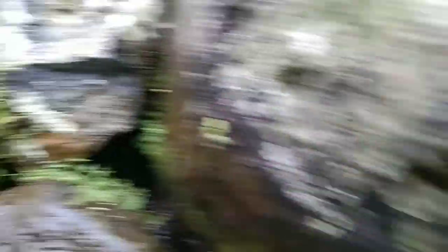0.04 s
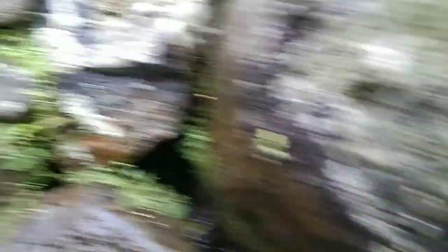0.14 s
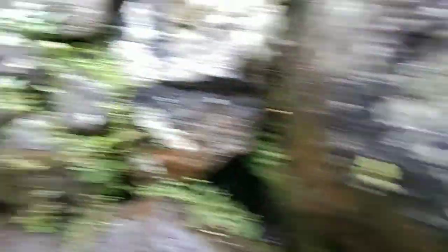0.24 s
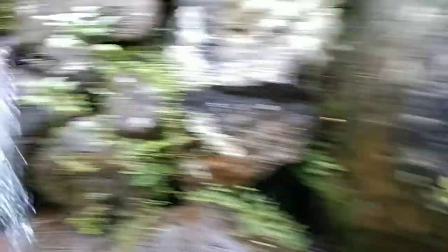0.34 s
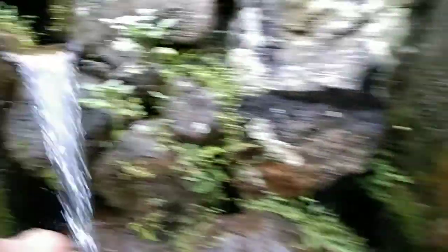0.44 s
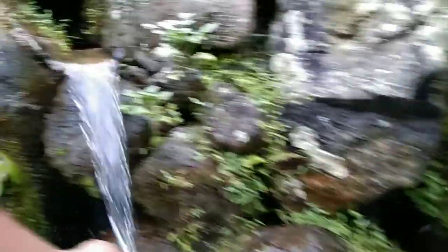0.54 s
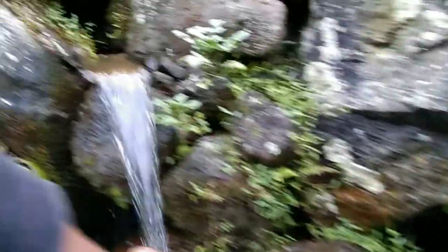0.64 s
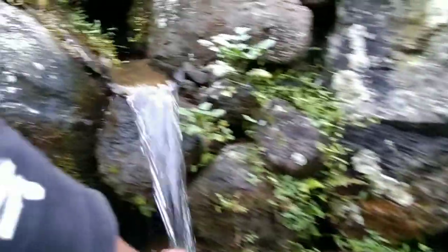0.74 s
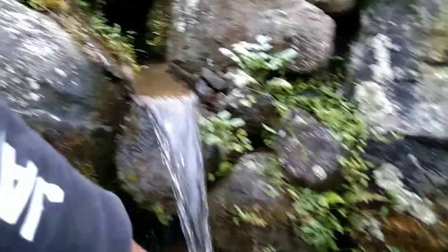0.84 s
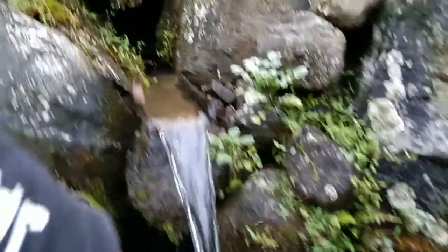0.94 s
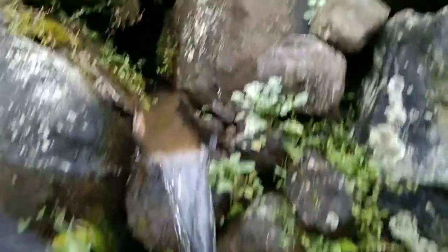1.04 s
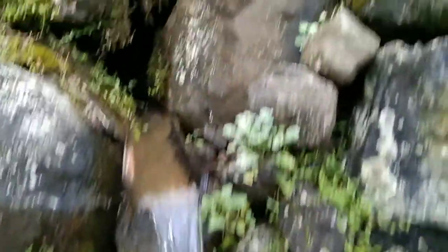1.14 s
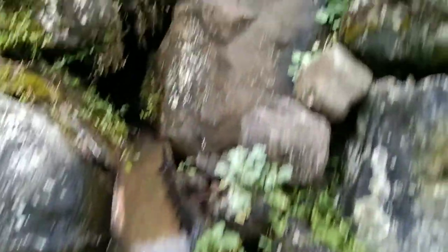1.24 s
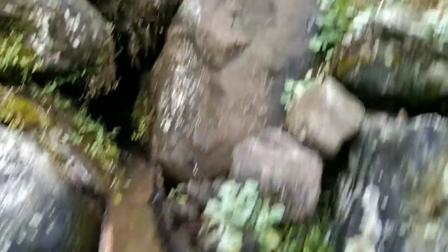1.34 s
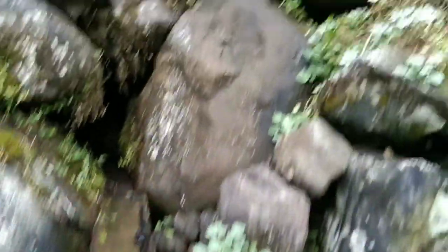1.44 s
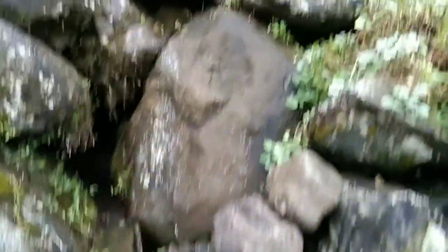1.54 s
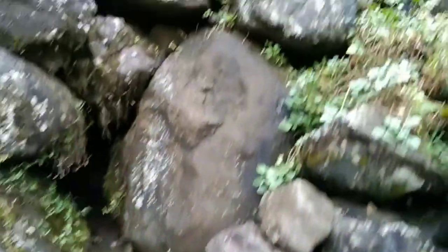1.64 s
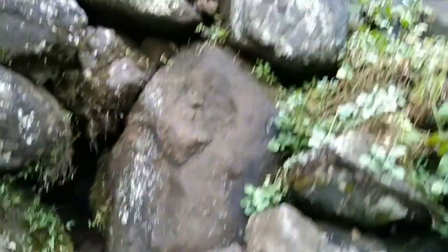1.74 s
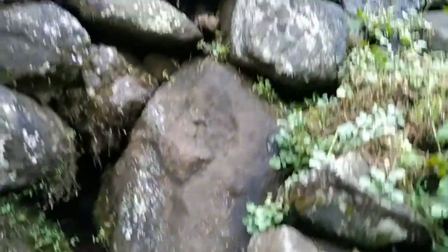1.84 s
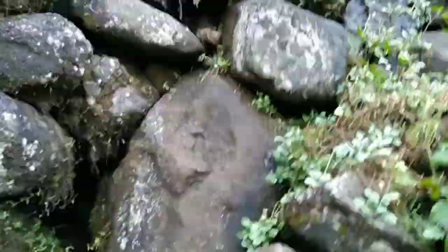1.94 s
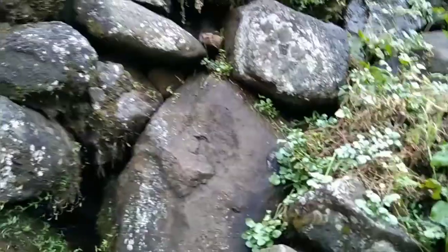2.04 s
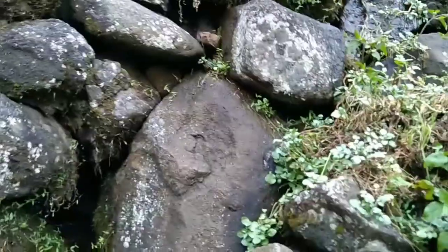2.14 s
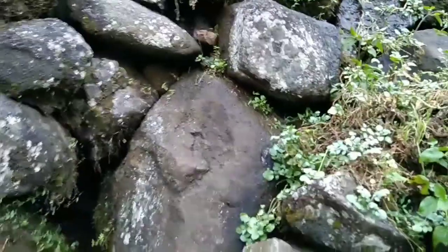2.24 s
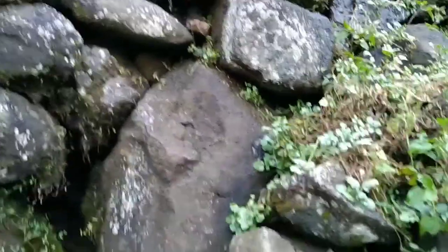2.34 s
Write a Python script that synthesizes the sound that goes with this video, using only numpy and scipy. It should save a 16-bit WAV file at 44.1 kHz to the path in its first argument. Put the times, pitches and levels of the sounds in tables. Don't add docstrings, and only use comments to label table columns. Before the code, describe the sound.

Thin stream of water splashing on stone, starting faint with bubbly plinks, becoming loud, sharp and crackling mid-way, then fading to sparse drops; close phone microphone, little bass, swirly gated hiss, faint air puffs.

```python
import sys
import numpy as np
from scipy import signal
from scipy.io import wavfile
from scipy.ndimage import uniform_filter1d

SR = 44100
rng = np.random.default_rng(int(sys.argv[2]) if len(sys.argv) > 2 else 0)


def ratio_of_db(decibels):
    return 10 ** (np.asarray(decibels, float) / 20)


def generate_wav(sig):
    pcm = np.round(np.clip(np.atleast_2d(sig).T, -1, 1) * 32767).astype(np.int16)
    wavfile.write(sys.argv[1], SR, pcm)


N = 105840

HOP, FRAME = 64, 512
STREAK_HZ = 65
ONSET_LAG_S = 0.004


def in_time(rows, t):
    s, *columns = np.transpose(rows)
    return [np.interp(t, s, c) for c in columns]


def at_hz(points, hz):
    p = np.array(points)
    return np.interp(np.log(hz + 1), np.log(p[:, 0]), p[:, 1])


def rms_one(x):
    return x / np.sqrt(np.mean(x ** 2) + 1e-20)


def bins_and_times(frame):
    return np.arange(frame // 2 + 1) * SR / frame, np.arange(-(-N // HOP) + 1) * HOP / SR


def shaped(x, gain, frame):
    z = signal.stft(x, nperseg=frame, noverlap=frame - HOP)[2]
    n = min(z.shape[1], gain.shape[1])
    z = z[:, :n] * gain[:, :n] * np.sqrt(frame / 2)
    y = signal.istft(z, nperseg=frame, noverlap=frame - HOP)[1]
    return np.pad(y, (0, N))[:N]


def chance(frame, width_hz, size):
    hz, t = bins_and_times(frame)
    blur = np.exp(-0.5 * ((hz[:, None] - hz) / width_hz) ** 2)
    field = blur @ rng.standard_normal((len(hz), len(t)))
    for _ in range(2):
        field = uniform_filter1d(field, size=size, axis=1)
    return rms_one(field)


def ring(clicks, hz, t60):
    r, w = ratio_of_db(-60 / (t60 * SR)), 2 * np.pi * hz / SR
    return signal.lfilter([0, np.sin(w)], [1, -2 * r * np.cos(w), r * r], clicks + 1e-18)


def burst(noise, band_hz, decay_s):
    u = np.arange(len(noise)) / SR
    band = signal.butter(4, band_hz, "band", fs=SR, output="sos")
    x = signal.sosfilt(band, noise * np.sqrt(u) * np.exp(-u / decay_s))
    return x / np.abs(x).max()


def openings(source, rows, frame, width_hz, sag_db, gain_db, flicker):
    hz, t = bins_and_times(frame)
    power = np.zeros((len(hz), len(t)))
    for s, db, centre, length in rows:
        band = np.exp(-((hz - centre) / width_hz * 2) ** 2) + 1e-12
        u = np.maximum(t - s, 0) / length
        shape = (t > s + ONSET_LAG_S) * ratio_of_db(-2 * sag_db * u) * np.exp(-u ** 6)
        power += ratio_of_db(2 * (db + gain_db)) * np.outer(band / band.sum(), shape)
    return shaped(source, np.sqrt(power) * flicker, frame)


def plinks(rows, boost_db, decay_s):
    out, u = np.zeros(N + SR), np.arange(SR // 20) / SR
    envelope = np.minimum(u / 0.0012, 1) * np.exp(-u / decay_s)
    for (s, db, hz, _), turn in zip(rows, rng.random(len(rows))):
        tone = np.sin(2 * np.pi * (hz * u * (1 + 1.68 * u) + turn)) * envelope
        i = int((s + ONSET_LAG_S) * SR)
        out[i:i + len(u)] += ratio_of_db(db + boost_db) * tone
    return out[:N]


def water():
    drops_per_s, drop_spread_db, drop_s = 300, 2.5, 0.0025
    fizz_per_s, fizz_db, fizz_cycles = 890, -10, 2.8
    sizes = ratio_of_db(drop_spread_db * np.minimum(rng.exponential(1, N), 3))
    r = np.exp(-1 / (drop_s * SR))
    swell = signal.lfilter([1], [1, -r], sizes * (rng.random(N) < drops_per_s / SR))
    hiss = rms_one(rng.standard_normal(N) * (1 + 0.63 * swell))

    sizes = ratio_of_db(1.23 * np.minimum(rng.exponential(1, N), 4)) * rng.choice([-1, 1], N)
    born = rng.random(N) < fizz_per_s / SR
    dealt = rng.integers(0, 30, N)
    fizz = np.zeros(N)
    for k, hz in enumerate(np.linspace(500, 15500, num=30)):
        fizz += ring(sizes * born * (dealt == k), hz, fizz_cycles / np.sqrt(hz * 1000))
    return rms_one(hiss + ratio_of_db(fizz_db) * rms_one(fizz))


def spray(source, flicker):
    # (time [s], spray level [dB], margin over the noise estimate [dB])
    nearness = [(0, -45.5, -8), (.2, -34.5, -3.5), (.52, -23.5, -8), (.64, -23.5, 3), (.74, -16.5, 6),
                (1.0, -23, 11), (1.3, -17.5, 7), (1.41, -25, 7), (1.52, -30.5, 1), (1.7, -29.5, 4),
                (1.85, -18, -11), (2.1, -23.5, -6.5), (2.4, -27.5, -8)]
    # (frequency [Hz], level [dB per Hz])
    spray_colour = [(900, -37.5), (2100, -19.5), (2700, -3.5), (3600, 3), (5500, 2), (7600, 1.5),
                    (10000, -9.5), (15500, -20.5)]
    # (frequency [Hz], margin [dB])
    band_margin = [(2600, -7), (3900, -6.5), (5300, -5), (7000, -2), (10000, -2), (14000, 5)]
    depth_db, soft_db, chance_db, release_s = -32, 2, 8.5, 0.087
    hz, t = bins_and_times(FRAME)
    level_db, margin_db = in_time(nearness, t)
    luck = 0.83 * chance(FRAME, 9.1, size=30) + 0.082 * chance(FRAME, 900, size=20)
    over = chance_db * luck + margin_db + at_hz(band_margin, hz)[:, None]
    shut_db = depth_db / (0.5 + np.exp(np.clip(over / soft_db, -30, 30)))
    fall = 20 * t / release_s
    gate_db = np.maximum.accumulate(shut_db + fall, axis=1) - fall
    colour = rms_one(ratio_of_db(at_hz(spray_colour, hz))) / np.sqrt(len(hz))
    return shaped(source, colour[:, None] * ratio_of_db(level_db + gate_db) * flicker, FRAME)


def residue():
    # (frequency [Hz], level [dB per Hz])
    rush_colour = [(40, 9), (110, 2), (400, 0), (6000, -1), (11000, -13)]
    hz, _ = bins_and_times(FRAME)
    colour = rms_one(ratio_of_db(at_hz(rush_colour, hz))) / np.sqrt(len(hz))
    blips = 1 + 5 * np.maximum(chance(FRAME, STREAK_HZ, size=30) - 1.3, 0) ** 2
    return ratio_of_db(-56) * shaped(rng.standard_normal(N), colour[:, None] * blips, FRAME)


def pool_bubbles(flicker, beads):
    # (time [s], level [dB], frequency [Hz], length [s])
    gurgles = [(0.006, -43.5, 1998, 0.42), (0.0, -54.5, 1720, 0.18), (0.0, -47, 1210, 0.067),
               (0.12, -39, 1690, 0.11), (0.182, -38, 1253, 0.05), (0.182, -42.5, 2400, 0.031),
               (0.236, -32, 1768, 0.026), (0.52, -48.5, 587, 0.089), (0.54, -38.5, 2544, 0.24),
               (0.746, -44, 1370, 0.13), (0.922, -46.5, 766, 0.075), (1.084, -42, 1390, 0.033),
               (1.165, -43, 1595, 0.059), (1.6, -51, 716, 0.026), (1.785, -55, 1795, 0.019),
               (1.9, -53, 710, 0.054), (1.95, -54, 364, 0.044), (2.12, -48.5, 546, 0.055),
               (2.21, -49.5, 2930, 0.11), (2.32, -48.5, 598, 0.062), (0.244, -33.5, 1598, 0.11),
               (0.291, -36, 1332, 0.075), (0.425, -40, 614, 0.069), (0.417, -42.5, 1945, 0.25),
               (0.419, -34, 1392, 0.21), (0.535, -32.5, 1898, 0.12), (0.699, -42.5, 1323, 0.14),
               (0.795, -39.5, 2410, 0.15), (0.809, -39, 1115, 0.059), (0.813, -44, 1916, 0.048),
               (0.921, -40.5, 1685, 0.066), (0.945, -40, 2000, 0.042), (0.958, -41, 2300, 0.035),
               (0.979, -40.5, 1005, 0.12), (1.03, -32, 1258, 0.065), (1.105, -39, 1754, 0.13),
               (1.18, -43, 1310, 0.087), (1.236, -46, 598, 0.13), (1.27, -45, 1960, 0.056),
               (1.295, -42, 1248, 0.12), (1.34, -44, 2050, 0.06), (1.491, -45.5, 1298, 0.059),
               (1.576, -48, 1275, 0.068), (1.874, -43.5, 1504, 0.019), (2.102, -40.5, 1837, 0.12),
               (2.16, -47.5, 1270, 0.1), (2.292, -46, 557, 0.074), (2.377, -47, 836, 0.022)]
    # (time [s], peak [dB], frequency [Hz])
    glugs = [
        (0.067, -42, 1028),
        (0.115, -43.5, 620),
        (0.336, -52.5, 380),
        (0.841, -49, 740),
        (1.518, -51, 723),
        (2.069, -52, 557),
    ]
    pool = gurgles + [(s, db, hz, 0.07) for s, db, hz in glugs]
    noise = rng.standard_normal(N)
    rush = openings(noise, pool, FRAME, 133, 8.1, -4.0, flicker ** 0.34 * beads ** 1.1)
    return rush + plinks(pool, 4.46, 0.0099)


def splashes(source, flicker):
    # (time [s], level [dB], frequency [Hz], length [s])
    swinging_in = [(0.011, -36, 6640, 0.12), (0.02, -43.5, 2720, 0.16), (0.09, -28.5, 4000, 0.055),
                   (0.1, -37.5, 4640, 0.08), (0.202, -30.5, 7570, 0.12), (0.232, -28, 2920, 0.036),
                   (0.227, -32.5, 3610, 0.11), (0.228, -31, 4140, 0.11), (0.233, -22.5, 4880, 0.1),
                   (0.297, -38, 2713, 0.087), (0.352, -29.5, 7260, 0.029), (0.42, -36, 5410, 0.18),
                   (0.426, -32.5, 3820, 0.033), (0.423, -23.5, 4520, 0.033), (0.424, -21, 6500, 0.017),
                   (0.543, -39, 8520, 0.32), (0.544, -35, 3370, 0.076), (0.542, -33, 5160, 0.12),
                   (0.549, -30.5, 7370, 0.51), (0.577, -35, 6400, 0.036)]
    # (time [s], level [dB], frequency [Hz], length [s])
    turning_away = [(1.46, -38, 3900, 0.14), (1.464, -37.5, 5400, 0.25), (1.472, -29.5, 3336, 0.2),
                    (1.473, -29, 6070, 0.021), (1.5, -31.5, 6940, 0.13), (1.55, -32.5, 7500, 0.17),
                    (1.61, -32, 7370, 0.069), (1.665, -28, 7820, 0.2), (1.666, -30.5, 3590, 0.25),
                    (1.696, -40.5, 8800, 0.37), (1.697, -24, 6090, 0.11), (1.765, -31, 4020, 0.26),
                    (1.95, -28, 4100, 0.055), (1.954, -21, 3780, 0.056), (2.005, -33, 6350, 0.017),
                    (2.034, -30, 4720, 0.048), (2.039, -27.5, 3640, 0.047), (2.043, -29, 6970, 0.27),
                    (2.116, -40.5, 3810, 0.16), (2.099, -29.5, 4460, 0.14), (2.133, -31, 5960, 0.075),
                    (2.275, -38, 6300, 0.21), (2.264, -34, 6860, 0.55), (2.265, -31, 5800, 0.037),
                    (2.3, -28, 3640, 0.042), (2.323, -25.5, 6090, 0.036), (2.349, -28, 3690, 0.043)]
    rows = swinging_in + turning_away
    bands = openings(source, rows, FRAME, 300, 9.7, -10, np.minimum(flicker, 2.5))
    return bands + plinks(rows, 1.6, 0.0021)


def cracks():
    # (time [s], peak [dB], frequency [Hz], snap level [dB])
    ticks = [(0.0189, -34, 6650, -63), (0.0533, -31, 2610, -50), (0.0927, -34, 4160, -59),
             (0.1064, -19.5, 4110, -58), (0.17, -27, 4800, -59), (0.2064, -38, 7300, -44),
             (0.2326, -20, 7730, -30), (0.2637, -16.5, 4910, -46), (0.2978, -20, 2900, -31),
             (0.335, -27.5, 2610, -47), (0.377, -27, 7000, -51), (0.402, -25, 7120, -47),
             (0.4265, -13.5, 4520, -28), (0.5493, -25, 6600, -48), (0.5509, -17, 5400, -31),
             (0.6404, -9, 8000, -22), (0.7398, -6.5, 4300, -34), (0.7582, -7.5, 5350, -20),
             (0.7951, -6, 5490, -36), (0.8155, -1.5, 7970, -32), (0.8779, -8.5, 3290, -42),
             (0.9443, -30, 7900, -31), (0.956, -9, 2800, -22), (1.0068, -12, 4900, -17.5),
             (1.033, -6.5, 3890, -18), (1.0923, -8, 7600, -22), (1.1476, -2, 3674, -20),
             (1.183, -3, 7420, -17), (1.1937, -2.5, 7480, -22), (1.258, -3, 7680, -20),
             (1.335, -6, 4850, -46), (1.3947, -7.5, 7160, -39), (1.4311, -17.5, 3900, -42),
             (1.4805, -9.5, 5900, -44), (1.5282, -8.5, 6480, -36), (1.5528, -11, 7130, -27),
             (1.6115, -14, 6840, -45), (1.667, -10.5, 7500, -26), (1.699, -6.5, 7570, -26.5),
             (1.7568, -15, 6160, -34), (1.909, -21.5, 4200, -47), (1.9545, -20, 4000, -43),
             (1.9789, -16.5, 4020, -48), (2.0128, -27, 6800, -45), (2.0426, -18, 7160, -26),
             (2.1056, -9.5, 4230, -43), (2.147, -15, 6760, -47), (2.2503, -23.5, 6760, -46),
             (2.3281, -25, 6900, -30), (2.357, -24, 3680, -47)]
    crack_db, crack_s, width = -6, 0.0017, 0.11
    snap_db, snap_s, snap_passes_db = 13, 0.0021, -23
    out, n = np.zeros(N + SR), SR // 20
    for s, db, hz, top_db in ticks:
        edge = burst(rng.standard_normal(n), [hz / (1 + width), hz * (1 + width)], crack_s)
        edge = edge + 0.016 * ring(edge, hz, 0.039)
        snap = burst(rng.standard_normal(n), [4800, 15000], snap_s)
        snap = signal.lfilter([0.5], [1, -0.5], snap)
        level_db = top_db + snap_db + min(top_db - snap_passes_db, 0)
        i = int(s * SR)
        out[i:i + n] += ratio_of_db(db + crack_db) * edge / np.abs(edge).max() + ratio_of_db(level_db) * snap
    return out[:N]


def puffs():
    # (time [s], peak [dB])
    gusts = [
        (0.065, -47),
        (0.33, -42.5),
        (0.477, -50),
        (0.689, -53),
        (0.787, -43),
        (1.661, -54.5),
    ]
    rows = [(s, db, 110, 0.07) for s, db in gusts]
    return openings(rng.standard_normal(N), rows, 930, 92, 13.5, 0.5, 0.91)


def slaps():
    # (time [s], peak [dB])
    hits = [
        (0.2319, -16),
        (0.7418, -18),
        (1.007, -9),
        (1.1483, -7.5),
        (1.1939, -7.5),
    ]
    # [low [Hz], high [Hz]]
    slap_band = [2730, 5300]
    out, n = np.zeros(N + SR), SR // 20
    for s, db in hits:
        i = int(s * SR)
        out[i:i + n] += ratio_of_db(db) * burst(rng.standard_normal(n), slap_band, 0.00079)
    return out[:N]


def scene():
    source = water()
    beads = ratio_of_db(chance(FRAME, 290, size=6))
    streaks = ratio_of_db(7.5 * chance(FRAME, STREAK_HZ, size=40))
    flicker = rms_one(streaks * beads ** 3.5) * 3
    out = spray(source, flicker ** 0.32) + residue()
    out += pool_bubbles(flicker, beads)
    out += splashes(source, flicker)
    out += cracks() + puffs() + slaps()
    return out[None]


def low_pass(x):
    return signal.sosfilt(signal.butter(12, 16360, fs=SR, output="sos"), x)


def record(dry):
    top_cut = signal.cheby2(22, 60, 16100, fs=SR, output="sos")
    bass_cut = signal.butter(3, 62, "high", fs=SR, output="sos")
    mix = signal.sosfilt(bass_cut, signal.sosfilt(top_cut, dry))
    return low_pass(mix)


dry = scene()
out = record(dry)
generate_wav(out)
```